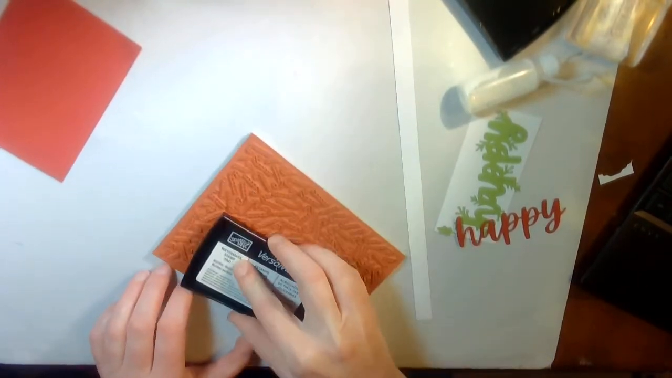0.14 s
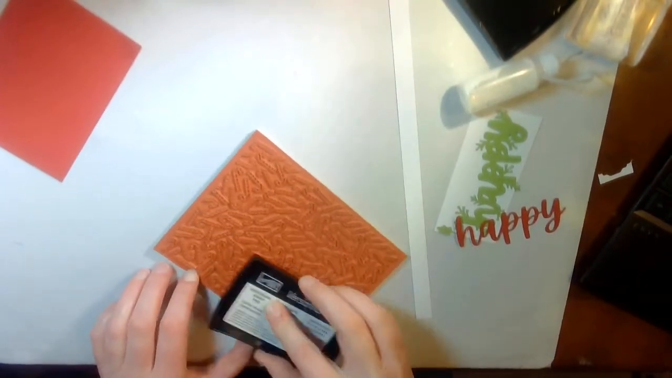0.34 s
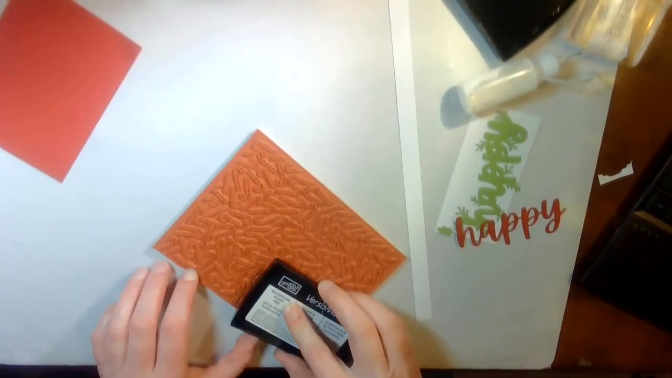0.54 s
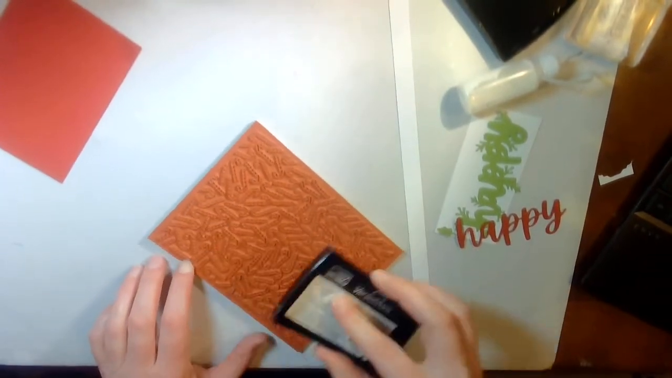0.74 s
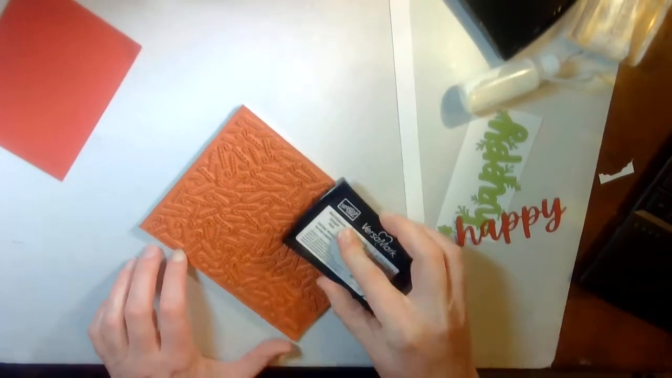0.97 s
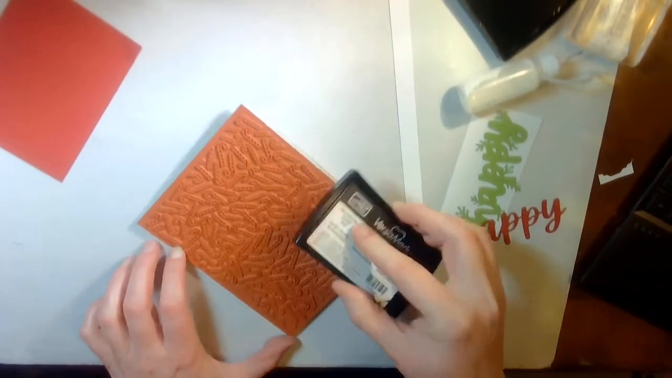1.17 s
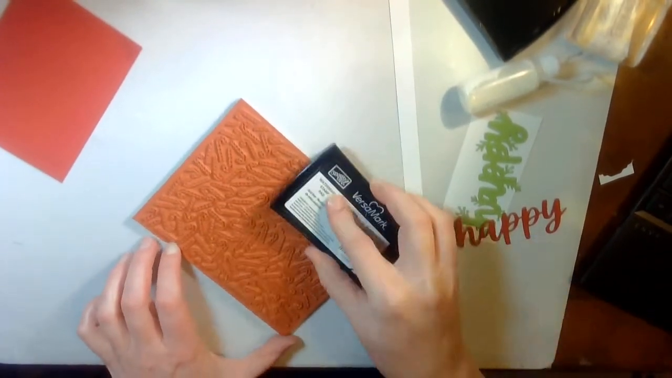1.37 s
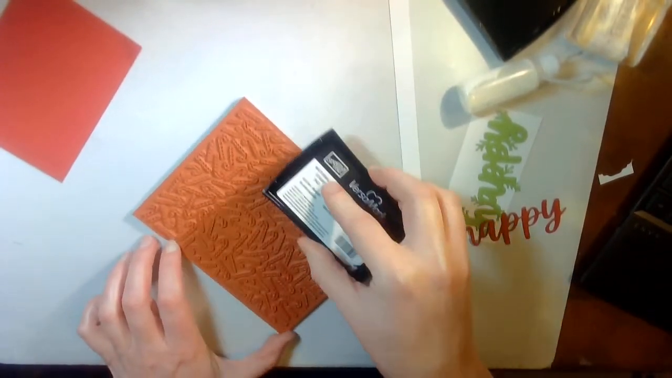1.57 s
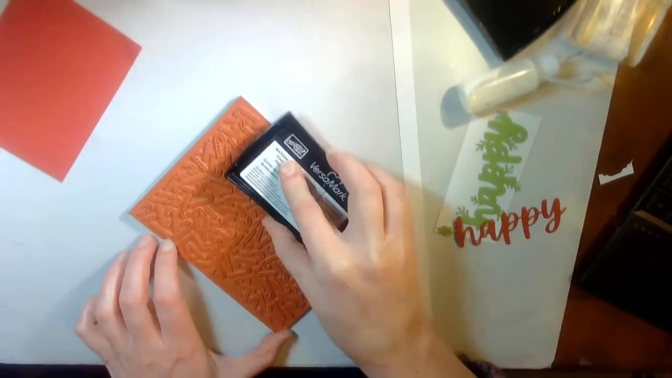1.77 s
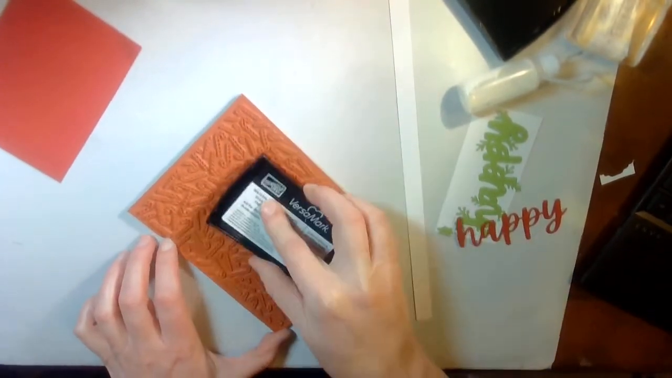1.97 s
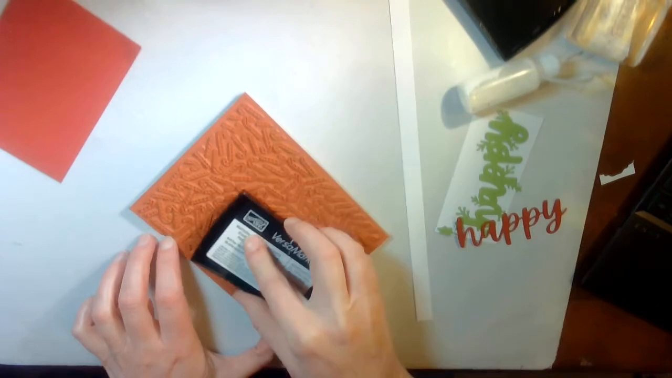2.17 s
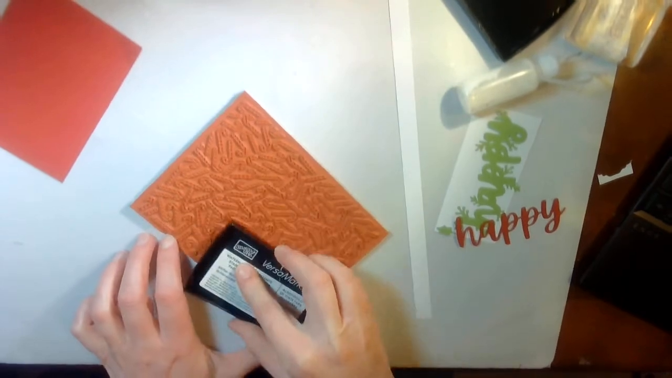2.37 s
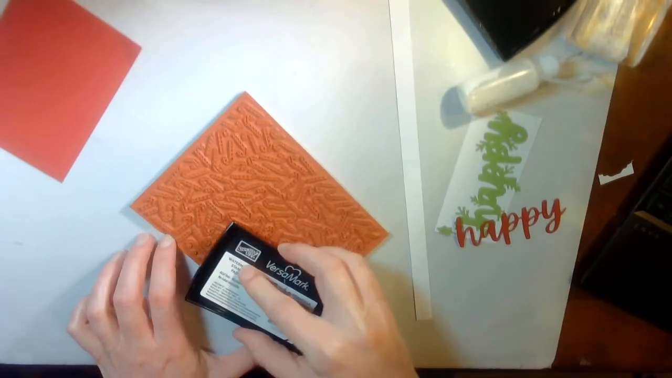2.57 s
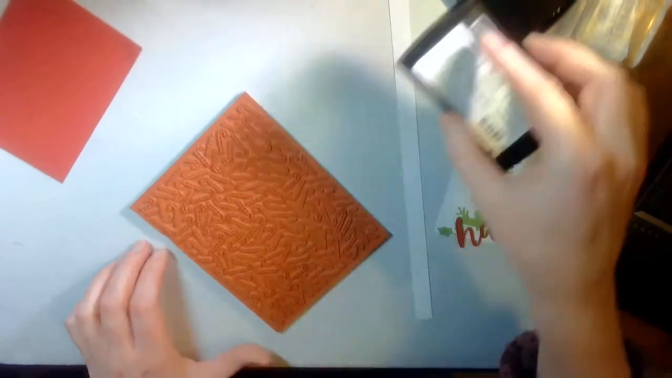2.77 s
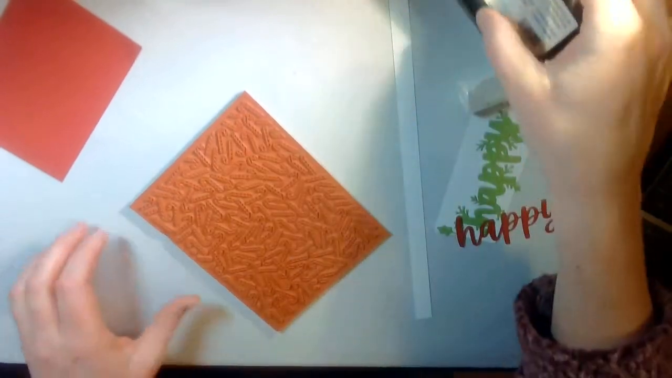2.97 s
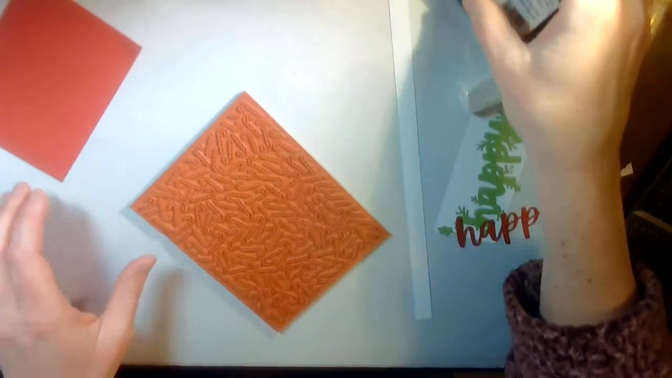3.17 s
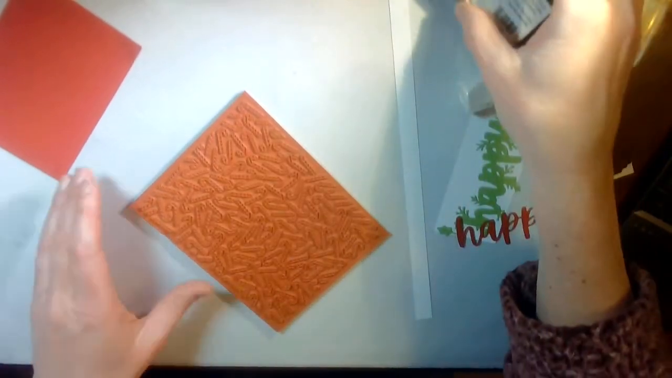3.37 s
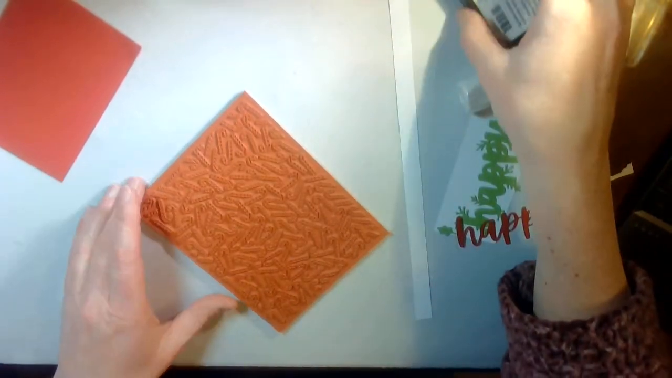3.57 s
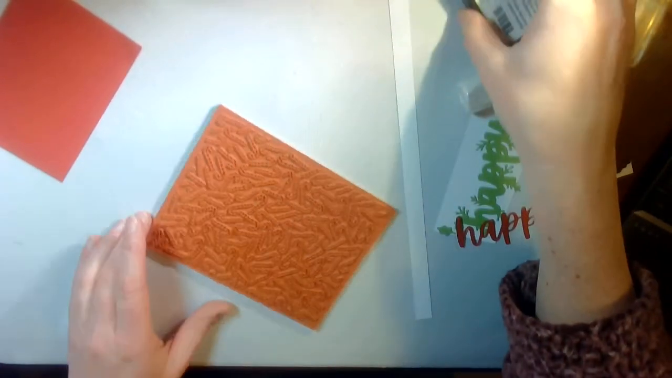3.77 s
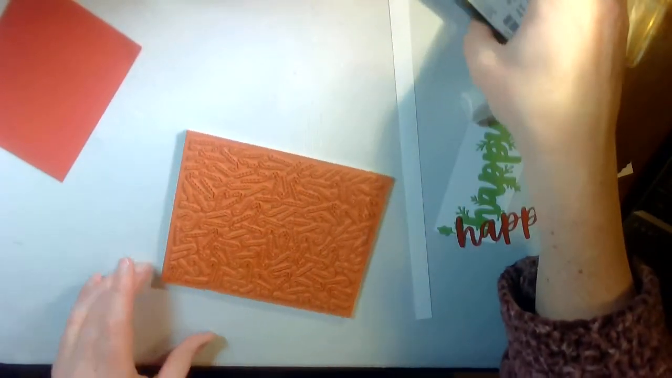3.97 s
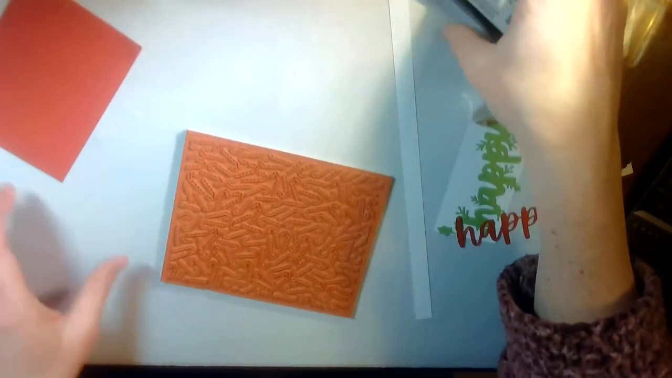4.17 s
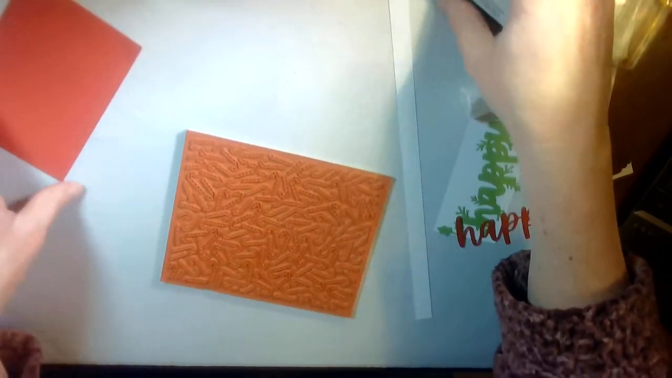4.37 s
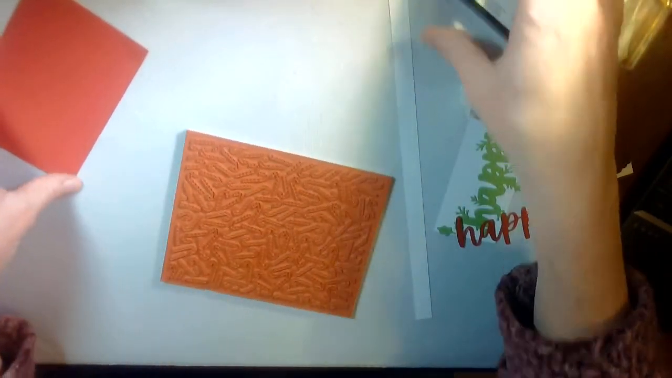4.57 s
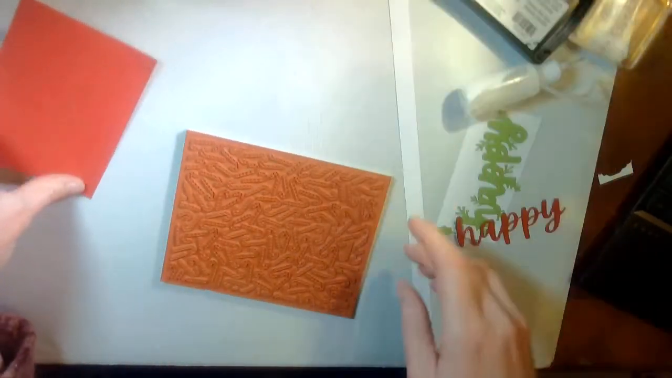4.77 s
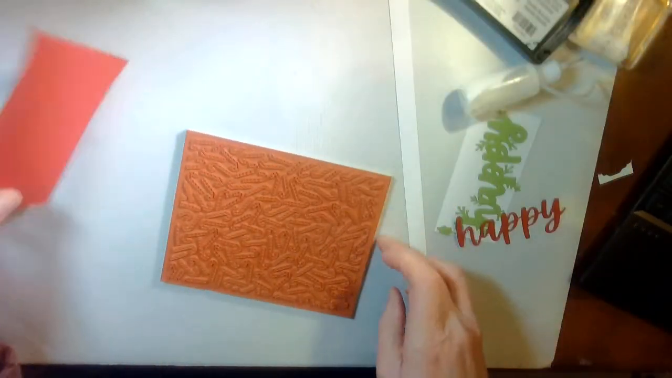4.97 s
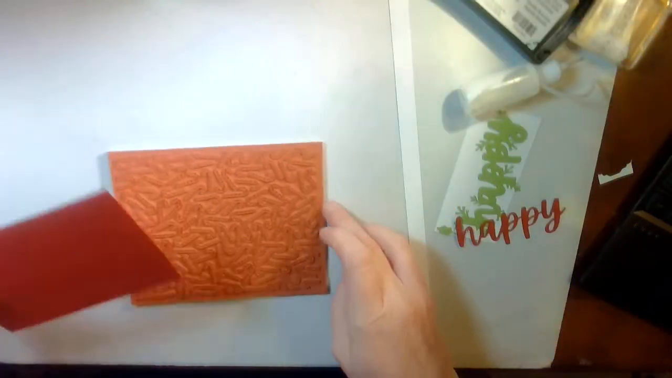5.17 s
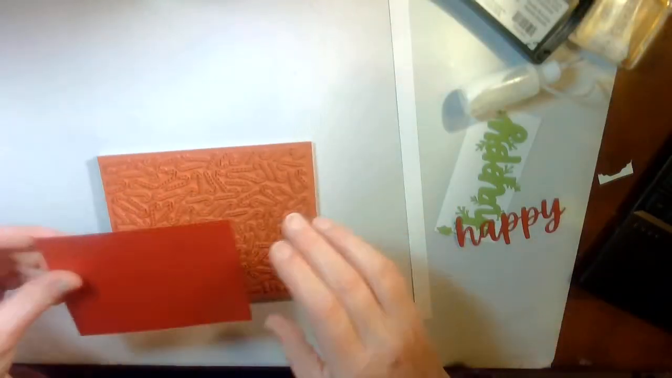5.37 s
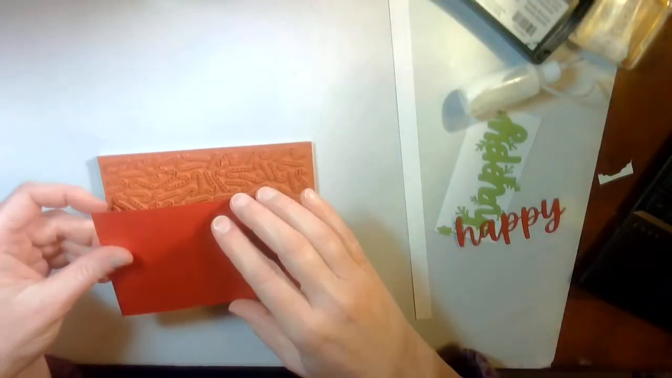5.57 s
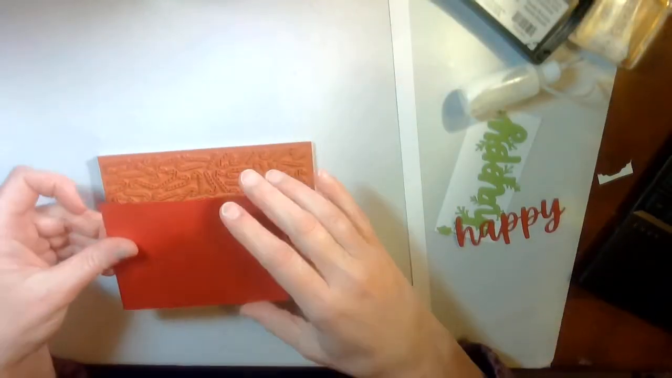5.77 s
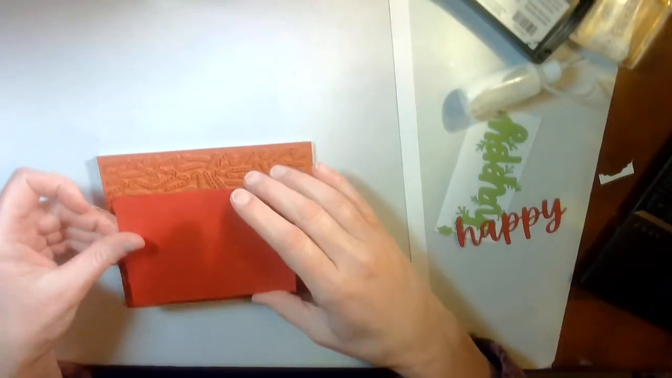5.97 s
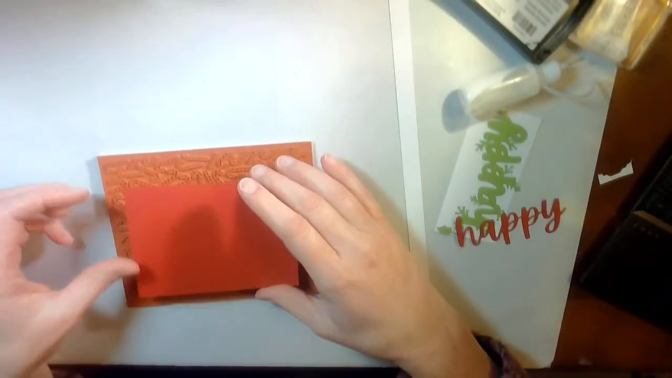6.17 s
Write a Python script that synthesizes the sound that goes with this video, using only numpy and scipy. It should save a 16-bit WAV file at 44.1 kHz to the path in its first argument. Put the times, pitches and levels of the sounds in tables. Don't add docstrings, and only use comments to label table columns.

```python
import sys
import numpy as np
from scipy import signal
from scipy.fft import rfft, irfft
from scipy.io import wavfile
from scipy.ndimage import uniform_filter1d

SR = 44100
rng = np.random.default_rng(int(sys.argv[2]) if len(sys.argv) > 2 else 0)


def voltage_ratio(decibels):
    exponent = np.asarray(decibels, float) / 20
    return 10 ** exponent


def pcm_store(signal):
    levels = np.round(np.clip(np.atleast_2d(signal), -1, 1) * 32767)
    wavfile.write(sys.argv[1], SR, levels.astype(np.int16).T)


N = 274743

# freq_hz, density_db
FLOOR_SPECTRUM = [(12, -38), (20, -1), (77, -4), (289, -17.5), (772, -24), (2310, -28.5), (4280, -36.5),
                  (15200, -32.5)]
# centre_hz, width_hz, rms_db
HISS_HUMPS = [(12660, 700, -76), (16000, 270, -80.5)]
# pitch_hz, wander_hz, rms_db
HUM_LINES = [(61, 1.17, -55.5), (150.6, 3, -66.5), (223.4, 2.2, -68), (12390, 3, -88.5), (15330, 3, -83.5)]
# freq_hz, t60_s
ROOM_T60 = [(300, 0.98), (1500, 0.38), (4500, 0.24), (9000, 0.29), (16000, 0.45)]
# centre_hz, width_hz, gain_db
PORT_MODES = [(4447, 680, 5), (4820, 280, 2)]
# low_hz, high_hz
BANDS = [(3000, 6000), (450, 1300), (1300, 3000), (6000, 15800)]
# time_s, level_db
RUSTLE = [(0.0, -70), (0.26, -68), (0.47, -73.5), (0.95, -67.5), (1.54, -68.5), (1.68, -72), (2.71, -68),
          (3.19, -76), (3.5, -66), (3.78, -63), (4.09, -70), (4.85, -65.5), (5.04, -61), (5.211, -63.5),
          (5.35, -75), (5.67, -62.5), (5.81, -73.5), (6.2, -64.5)]
# centre_s, length_s, pitch_hz, rms_db
SQUEAKS = [(4.718, 0.058, 4760, -63), (4.817, 0.035, 3900, -54), (5.51, .05, 4530, -75),
           (5.58, 0.031, 4700, -61), (5.75, 0.033, 1350, -47), (5.774, 0.049, 1950, -52),
           (5.781, 0.028, 5060, -55), (6.146, 0.045, 4500, -71)]
# centre_s, level_3_6khz_db,
# dullness_db, length_s
PATS = [(.975, -63, -2, .052), (3.14, -63.5, 4.5, 0.028), (3.2, -68.5, 1, 0.028),
        (3.975, -61.5, -0.5, 0.02), (1.228, -67.5, 11, 0.017), (4.977, -67, 16.5, .024),
        (5.57, -65, 3, 0.044), (5.64, -61.5, -0.5, 0.06), (5.78, -52.5, -0.5, 0.045)]
# centre_s, level_3_6khz_db, dullness_db, length_s
BRUSHES = [(3.66, -61.5, -10, .077), (4.712, -52.5, -5.5, .057), (4.815, -49, 0, .073),
           (4.87, -52.5, -1, .022), (4.935, -53.5, 3, 0.043), (5.01, -55, -21, .058),
           (5.11, -58, -16, .075), (5.17, -63, -17, .035), (5.752, -52.5, -0.5, .041),
           (5.82, -63, 7, 0.035), (5.98, -64.5, 1, .066), (6.045, -59.5, 1, .019), (6.15, -62, -9, 0.098)]
# centre_s, level_3_6khz_db, dullness_db, length_s
PEELS = [(.155, -57.5, 5, 0.027), (.32, -61, -3, 0.047), (.682, -52, -2, 0.049), (.85, -69, -14, 0.069),
         (1.12, -55, -6, 0.085), (1.52, -57.5, -7, 0.1), (1.89, -62.5, -10, .076), (2.11, -60.5, -4, 0.051),
         (2.29, -61.5, 2.5, 0.037), (2.53, -58, -4.5, 0.082), (2.87, -65.5, 3, 0.095)]
# start_s, level_3_6khz_db, dullness_db, contact_s
EDGE_CLACKS = [
    (3.3584, -12.5, -10, 0.0031),
    (3.4036, -5, 1.5, 0.0057),
    (3.4826, -21.5, 3, .004),
    (4.319, -8, -7, .0055),
    (4.9108, -24, 0, 0.0034),
]
# start_s, level_3_6khz_db, dullness_db, contact_s
FACE_CLACKS = [
    (3.528, -23.5, 2, 0.0028),
    (4.1047, -27, -7.5, 0.0035),
    (4.3155, -6, -4, .008),
]
# start_s,
# pitch_hz, level_db, t60_s
RINGS = [(.487, 1380, -29, .04), (3.123, 198, -42, .15), (3.404, 2100, -14, .015), (3.41, 14000, -46, .03),
         (3.405, 830, -28, .06), (3.528, 700, -30, .025), (3.359, 2000, -27, .03), (4.316, 580, -19, .04),
         (4.106, 6900, -48, .07), (4.316, 738, -16, .05), (4.318, 3550, -22, .03), (4.318, 4740, -22, .06),
         (.462, 420, -31, .12), (1.3196, 2600, -12, .006), (1.3197, 4300, -13, .006),
         (.4556, 3000, -15, .008), (3.5285, 5000, -26, .012), (1.2205, 1600, -42, .02),
         (4.911, 1700, -34, .03), (4.316, 950, -24, .05), (.49, 3300, -56, .33)]
# start_s, push_db, upper_modes_db, knock_db, panel_db
DABS = [(.010, -19, -3, 3, 10.5), (.237, -19, -2.5, -2.5, 2.5), (.454, -16, 1, -1.5, -1),
        (.907, -17, -7.5, 1.5, 1), (1.218, -37, -9, 10, 12.5), (1.317, -17.5, -1.5, 3, -8),
        (1.704, -21.5, -10, -5.5, -5), (1.976, -23, -3, 3, 6), (2.168, -24.5, -4, -6.5, 1.5),
        (2.355, -25.5, 2.5, -1.5, 10.5), (3.12, -43.5, 3, 3.5, 7), (3.402, -35, -4, 11, 11.5),
        (3.526, -39, 0, 9.5, -6), (4.317, -39.5, 6, 15, 16), (4.863, -37, 1, 4.5, -1),
        (4.973, -43, 10, 15.5, 16)]
# pitch_hz, level_db, t60_s
DESK_LOW = [(-36.5, -0.5, 0.55), (52, -14, 1), (60, 0.5, 0.28), (106, 0.5, 0.16), (130.5, -1, 0.16),
            (-143, -16.5, 0.65), (180, -18, 0.52)]
# pitch_hz, level_db, t60_s
DESK_HIGH = [(234.8, -15, 0.42), (257.7, -11.5, 0.29), (289.4, -12.5, 0.25), (306, -30, 0.08),
             (359, -1.5, 0.16), (385, -13.5, 0.23), (434.4, -5.5, 0.14), (540, -19, 0.15),
             (580, -21, 0.053)]
# pitch_hz, level_db, t60_s
PANEL_MODES = [(450, -27, 0.062), (491, -9.5, 0.14), (509, -12.5, 0.054)]
# low_hz, high_hz, level_db, t60_s
KNOCK_BANDS = [(199, 510, -10.5, 0.25), (430, 1100, -18.5, 0.15), (810, 1900, -21, 0.2)]
# start_s, level_3_6khz_db, dullness_db
TICKS = [(0.1393, -42.5, 1.5), (0.2206, -43, -0.5), (0.3104, -50, -15), (.7302, -40, -30),
         (.8026, -44, -25), (1.059, -52, -15), (1.504, -41.5, -20), (2.675, -40.5, -22), (2.7726, -47, -4),
         (3.1228, -50, -5), (3.7829, -46.5, 4.5), (4.309, -40, -2), (4.0948, -39.5, -11),
         (4.278, -40.5, -3), (4.2888, -32, 2), (4.297, -34, -5), (4.475, -41, -2), (4.5625, -49, -19),
         (4.7232, -48, -12), (4.8602, -32.5, -24), (4.9581, -35, 5.5), (5.2208, -43.5, -16),
         (5.5446, -37.5, 1.5), (5.6048, -45, 5), (6.037, -43, -17), (6.104, -42, -5), (6.1354, -52, -15),
         (6.169, -44, -6)]
# start_s, level_3_6khz_db, dullness_db, contact_s
SLAPS = [(.0098, -23.5, -0.5, 0.0015), (.0128, -18.5, -1, 0.0015), (.2392, -23, 3, 0.0033),
         (.455, -12.5, -2.5, 0.0024), (.486, -19, -2, 0.0014), (.909, -21, 6, 0.0023),
         (.940, -34, 8, 0.0022), (1.2197, -49, 11.5, 0.0041), (1.3193, -9, -1, .0011),
         (1.7056, -33, 3, 0.0038), (1.9785, -33, 4.5, 0.00193), (1.9855, -38, -9, 0.0029),
         (2.169, -36, 0.5, 0.0031), (2.3564, -32, 5, 0.0034), (3.851, -43, 5, 0.003)]


def rms_one(x):
    return x / np.sqrt(np.mean(x ** 2) + 1e-20)


def at_hz(points, hz):
    table_hz, value = np.transpose(points)
    return np.interp(np.log(hz), np.log(table_hz), value)


def band(x, low_hz, high_hz, order=2):
    sos = signal.butter(order, [low_hz, high_hz], "band", fs=SR, output="sos")
    return signal.sosfilt(sos, x + 1e-18)


def ring(clicks, hz, t60_s):
    r, w = voltage_ratio(-60 / (t60_s * SR)), 2 * np.pi * hz / SR
    return signal.lfilter([0, np.sin(w)], [1, -2 * r * np.cos(w), r * r], clicks + 1e-18)


def resonance(x, hz, width_hz):
    r = np.exp(-np.pi * width_hz / SR)
    top = np.array([1, 0, -1]) * (1 - r * r) / 2
    return signal.lfilter(top, [1, -2 * r * np.cos(2 * np.pi * hz / SR), r * r], x)


def wobble(shape, size):
    return rms_one(uniform_filter1d(rng.standard_normal(shape), size=size))


def grains(shape, spread_db):
    size_db = spread_db * np.minimum(rng.exponential(1, shape), 4)
    return rms_one(rng.standard_normal(shape) * voltage_ratio(size_db))


def coloured(rows, low_db, low_share, treble_db, treble_per_db):
    return [(s, level_db, low_db + low_share * dull_db, dull_db,
             treble_db + treble_per_db * (level_db + 26), length_s)
            for s, level_db, dull_db, length_s in rows]


def bursts(rows, envelope, lead, spread_db, patchy_db, size):
    trains, t = np.zeros((4, 2, N + 2 * size)), np.arange(size) / SR
    for (s, level_db, *colour_db, length_s), grain in zip(rows, grains((len(rows), size), spread_db)):
        start = size + round((s - lead * length_s) * SR)
        gains = voltage_ratio(level_db + np.r_[0, colour_db])
        shape = envelope(t / length_s)
        trains[:, 0, start:start + size] += gains[:, None] * grain * shape
        trains[:, 1, start] += gains * np.sqrt(np.sum(shape ** 2))
    trains[:, 0] *= voltage_ratio(patchy_db * wobble((4, N + 2 * size), size=200))
    out = np.zeros((2, N))
    for train, (low_hz, high_hz) in zip(trains, BANDS):
        to_rms_one = np.sqrt(SR / 2 / (high_hz - low_hz))
        out += to_rms_one * band(train[:, size:size + N], low_hz, high_hz, order=3)
    return out


def background():
    hz = np.maximum(np.fft.rfftfreq(N, 1 / SR), 1)
    hiss_top_hz = 15950
    spectrum = rfft(rng.standard_normal(N)) * voltage_ratio(at_hz(FLOOR_SPECTRUM, hz)) * (hz < hiss_top_hz)
    out = voltage_ratio(-55.0) * rms_one(irfft(spectrum, N))
    for centre_hz, width_hz, level_db in HISS_HUMPS:
        noise = resonance(rng.standard_normal(N), centre_hz, width_hz)
        out += voltage_ratio(level_db) * rms_one(resonance(noise, centre_hz, width_hz))
    for centre_hz, wander_hz, level_db in HUM_LINES:
        pitch_hz = centre_hz + wander_hz * wobble(N, size=8000)
        out += voltage_ratio(level_db) * np.sqrt(2) * np.sin(2 * np.pi * np.cumsum(pitch_hz) / SR)
    return out


def room(x):
    level_db, gap_s, near_db, near_t60_s = -12, 0.0032, 11, 0.15
    t, edges_hz = np.arange(SR // 2) / SR, 250 * 2. ** np.arange(7)
    white = rng.standard_normal((2, len(t)))
    tail = np.zeros(len(t))
    for k, (low_hz, high_hz) in enumerate(zip(edges_hz, edges_hz[1:])):
        t60_s = at_hz(ROOM_T60, np.sqrt(low_hz * high_hz))
        tail += band(white[k % 2], low_hz, high_hz) * voltage_ratio(-60 * t / t60_s)
    tail *= np.clip(t / gap_s, 0, 1) ** 2
    tail *= 1 + voltage_ratio(near_db - 60 * t / near_t60_s)
    return voltage_ratio(level_db) * signal.fftconvolve(x, tail / np.sqrt(np.sum(tail ** 2)))[:N]


def cloth():
    s, level_db = np.transpose(RUSTLE)
    rustle = band(grains(N, spread_db=-1.0), 2300, 6800) * voltage_ratio(1.4 * wobble(N, size=600))
    return voltage_ratio(np.interp(np.arange(N) / SR, s, level_db) - 0.5) * rms_one(rustle)


def squeaks():
    t, out = np.arange(N) / SR, np.zeros(N)
    white = rng.standard_normal(N)
    for s, length_s, hz, level_db in SQUEAKS:
        swell = np.exp(-(2 * (t - s) / length_s) ** 4)
        out += voltage_ratio(level_db) * swell * rms_one(resonance(white, hz, 270))
    return out


def strokes():
    def swell(u):
        return np.exp(-(2.25 * (u - 1)) ** 2)
    rows = coloured(PEELS, low_db=-21, low_share=4, treble_db=-16, treble_per_db=-0.3)
    rows += coloured(BRUSHES, low_db=-16, low_share=0.1, treble_db=-1.2, treble_per_db=0.05)
    rows += coloured(PATS, low_db=3, low_share=1.81, treble_db=-8, treble_per_db=0.5)
    return voltage_ratio(-3.0) * bursts(rows, swell, lead=1, spread_db=4.5, patchy_db=3.5, size=10000)[0]


def friction():
    out = strokes() + squeaks() + cloth()
    return out + room(out)


def clacks():
    def held(u):
        return np.minimum(u * 20.0, 1) * np.exp(-u ** 3) * (1 + np.exp(-4 * u)) / 1.3
    rows = coloured(EDGE_CLACKS, low_db=-24, low_share=1.6, treble_db=-22, treble_per_db=0.17)
    rows += coloured(FACE_CLACKS, low_db=-3, low_share=0.86, treble_db=-26.5, treble_per_db=0.255)
    return voltage_ratio(-9) * bursts(rows, held, lead=0.056, spread_db=6.5, patchy_db=-3.5, size=1024)


def part_rings():
    out = np.zeros(N)
    for s, hz, level_db, t60_s in RINGS:
        out += ring(voltage_ratio(level_db) * (np.arange(N) == round(s * SR)), hz, t60_s)
    return out


def slaps_and_ticks():
    def fading(u):
        return np.minimum(u * 3.9, 1) * np.exp(-u ** 1.72)
    tick_s = 0.0015
    ticks = [row + (tick_s,) for row in TICKS]
    rows = coloured(SLAPS, low_db=-8.5, low_share=1.22, treble_db=-21.5, treble_per_db=-0.8)
    rows += coloured(ticks, low_db=-2, low_share=1.7, treble_db=-21, treble_per_db=-0.8)
    return voltage_ratio(-6.5) * bursts(rows, fading, lead=.2, spread_db=2.0, patchy_db=-2.0, size=1024)


def contacts():
    chatter, click = slaps_and_ticks() + clacks()
    return chatter + voltage_ratio(-9) * click + part_rings() + room(click)


def desk():
    upper_lag_s, panel_lag_s = 0.00587, 0.012
    s, push_db, upper_db, knock_db, panel_db = np.transpose(DABS)
    at, out = np.round(s * SR).astype(int), np.zeros(N)

    def pushes(when, height):
        train = np.zeros(N)
        train[when] = height
        return train

    low_push = pushes(at, voltage_ratio(push_db - 2.0))
    for hz, level_db, t60_s in DESK_LOW:
        out += voltage_ratio(level_db - 6.0) * ring(low_push, hz, t60_s)
    for hz, level_db, t60_s in DESK_HIGH:
        lag, spread, sign = rng.standard_normal((3, len(at)))
        late = np.round(np.abs(lag) * upper_lag_s * SR).astype(int)
        height = voltage_ratio(push_db + upper_db + level_db - 10.5 + 3.7 * spread) * np.sign(sign)
        out += ring(pushes(at + late, height), hz, t60_s)
    panel_push = pushes(at + round(panel_lag_s * SR), voltage_ratio(push_db + panel_db - 8))
    for hz, level_db, t60_s in PANEL_MODES:
        out += voltage_ratio(level_db) * ring(panel_push, hz, t60_s)
    out = signal.lfilter(*signal.butter(1, 900, fs=SR), out)

    knock_push = pushes(at, voltage_ratio(push_db + knock_db - 10))
    for low_hz, high_hz, level_db, t60_s in KNOCK_BANDS:
        decay = signal.lfilter([1], [1, -voltage_ratio(-60 / (t60_s * SR))], knock_push)
        decay = uniform_filter1d(decay, size=200, origin=99)
        out += voltage_ratio(level_db) * decay * rms_one(band(rng.standard_normal(N), low_hz, high_hz))
    return out


def scene():
    air = friction() + contacts()
    port = sum(voltage_ratio(gain_db) * resonance(air, hz, width_hz) for hz, width_hz, gain_db in PORT_MODES)
    return (background() + air + port + desk())[None]


def roll_off(x):
    return signal.sosfilt(signal.butter(12, 16810, fs=SR, output="sos"), x)


def record(dry):
    input_top_hz, clip = 15950, 0.63
    closed = signal.sosfilt(signal.ellip(8, .5, 30, input_top_hz, fs=SR, output="sos"), dry)
    mix = clip * np.tanh(closed / clip)
    return roll_off(mix)


dry = scene()
out = record(dry)
pcm_store(out)
```